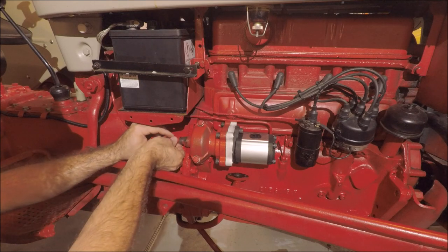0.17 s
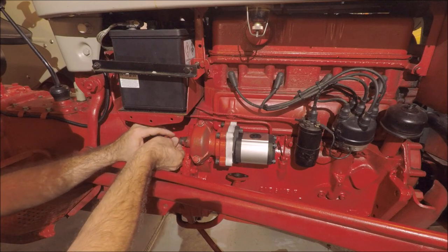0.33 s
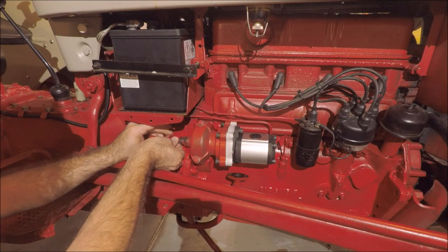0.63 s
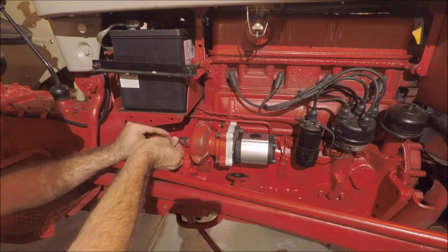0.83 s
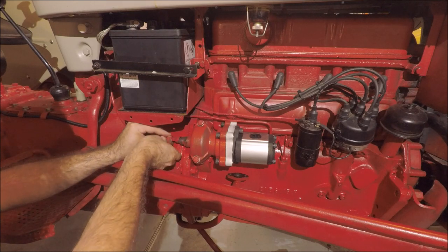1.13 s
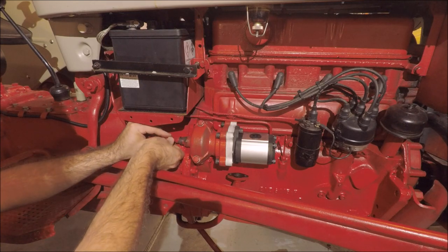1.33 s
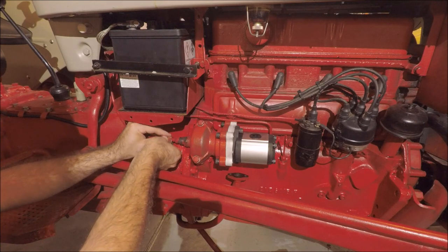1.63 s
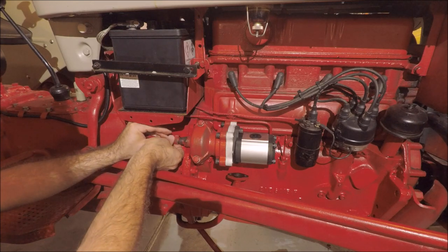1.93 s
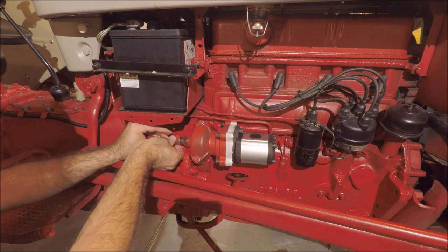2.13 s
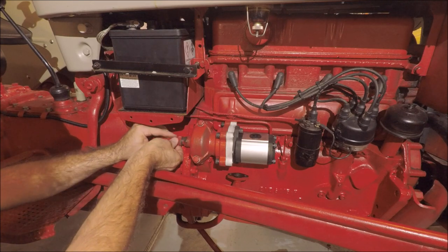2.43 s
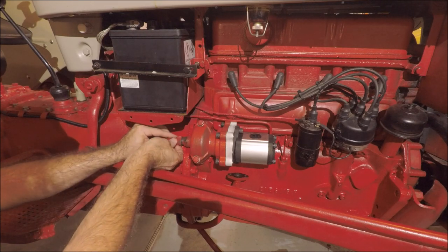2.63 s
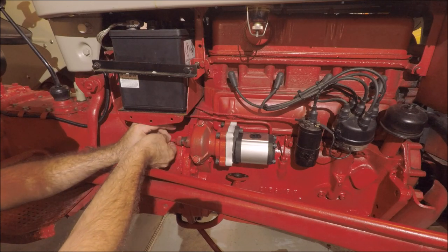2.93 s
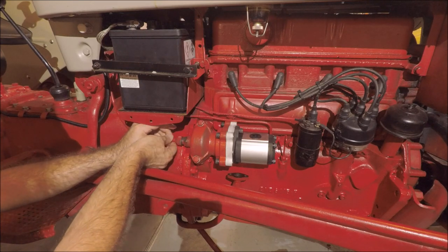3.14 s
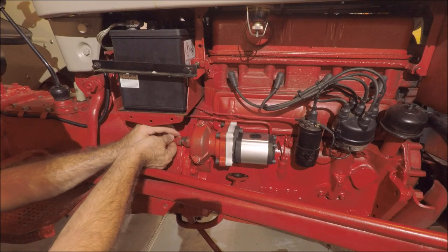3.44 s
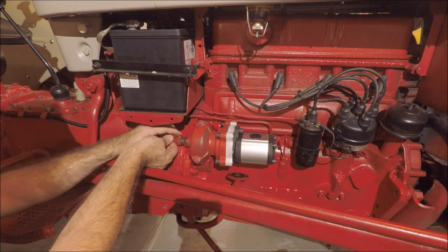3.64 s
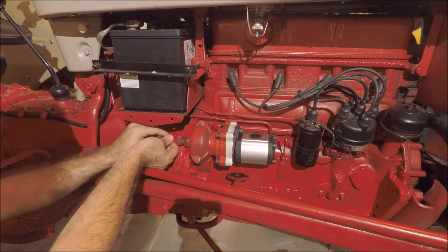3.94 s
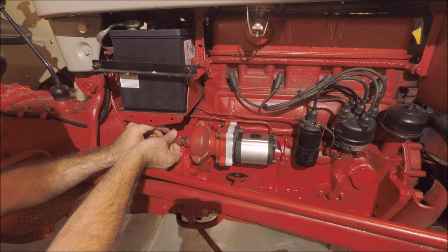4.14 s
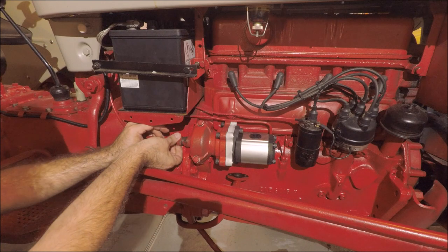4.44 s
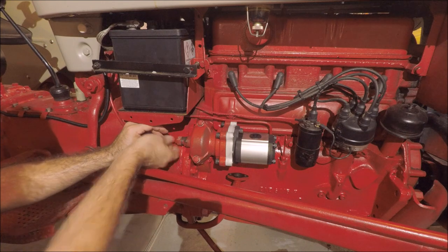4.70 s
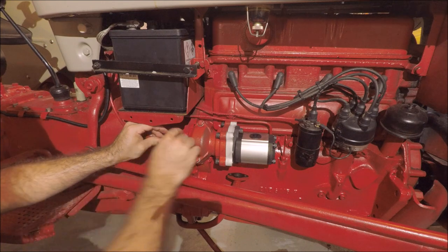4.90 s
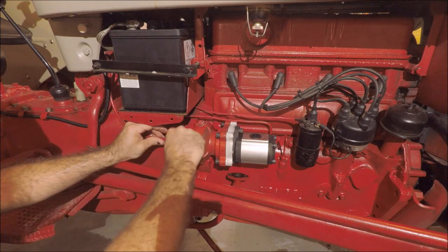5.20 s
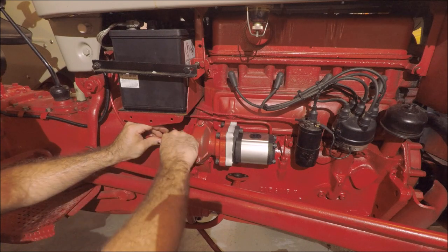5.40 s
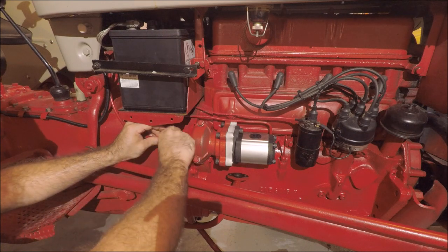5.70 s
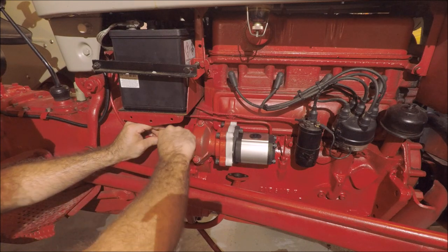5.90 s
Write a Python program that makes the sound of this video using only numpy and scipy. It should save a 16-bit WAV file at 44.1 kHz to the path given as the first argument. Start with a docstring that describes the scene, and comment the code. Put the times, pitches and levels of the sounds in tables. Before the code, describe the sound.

Over a fan motor's low hum and airy rumble, a nut ticks on its thread, metal clanks sharply twice, and hands softly bump sheet metal.

```python
"""In a workshop, a cable nut is threaded by hand onto a fitting on a tractor's stopped engine.
The threads tick (impulses into resonances) and scrape (friction noise); the steel cable end clanks and
hands bump the sheet metal (short noise forces into resonant bodies). The room answers with decaying noise.
Behind them a fan motor hums (sine multiples), a low tone swells once, and air rumbles and hisses (noise).
A limiter ducks loud moments, then the peaks are clipped."""
import sys
import numpy as np
from scipy import signal
from scipy.fft import rfft, irfft, next_fast_len
from scipy.io import wavfile
from scipy.ndimage import uniform_filter1d, map_coordinates

SR = 44100
rng = np.random.default_rng(int(sys.argv[2]) if len(sys.argv) > 2 else 0)


def pcm_store(signal):
    """Save signal as 16-bit PCM."""
    levels = np.round(np.clip(np.atleast_2d(signal), -1, 1) * 32767)
    wavfile.write(sys.argv[1], SR, levels.astype(np.int16).T)


N = 267246  # samples

# the steel cable end strikes the fitting: (time [s], relative level [dB], t60 [s])
CLANKS = [(1.7069, -29, 0.04), (2.1608, -9.5, 0.079), (2.2040, -25, 0.013), (2.2854, -11, 0.063),
          (2.329, -23, .018), (5.7424, -26, 0.016)]
# the nut catches on the thread: (time [s], relative level [dB], lower resonance [Hz])
THREAD_CATCHES = [(0.9362, -36.5, 7200), (2.0714, -22, 3360), (2.875, -15.5, 6320), (3.4367, -29.5, 3800),
                  (3.547, -31, 7750), (3.632, -25, 4030), (4.4785, -24, 3600), (4.54, -27.5, 3160),
                  (4.938, -41, 2350), (5.7815, -26, 3330)]
# hands and cable bump the sheet metal: (time [s], relative level [dB], hardness [0-1], panel t60 [s])
BUMPS = [(0.116, -37.5, 0.34, 0.22), (0.2, -40, 0.23, 0.11), (0.394, -37, 0.39, 0.25),
         (0.55, -42.5, 0.55, 0.19), (1.313, -43, 0.43, 0.33), (1.641, -42.5, .36, .18),
         (1.706, -31, .61, 0.35), (2.072, -41.5, 0.94, 0.098), (2.225, -34.5, 0.46, 0.33),
         (2.264, -31.5, 0.41, 0.14), (2.294, -32.5, 1, .12), (3.208, -38, 0.22, 0.05),
         (3.216, -37.5, 0.02, 0.083), (3.435, -42.5, .5, 0.25), (3.663, -40, 0.26, 0.24),
         (4.541, -34.5, 0.52, .09), (5.785, -32.5, 0.61, 0.17), (5.924, -44, 0.76, 0.071)]
# the nut slides round: (time [s], relative level [dB], length [s])
SCRAPES = [(0.542, -53, 0.044), (1.285, -49.5, 0.053), (2.149, -42, 0.045), (2.238, -43, 0.05),
           (2.662, -55, .067), (3.414, -48, 0.041), (3.513, -56, .065), (3.623, -48.5, 0.045),
           (4.388, -48.5, 0.066), (4.453, -48.5, 0.049), (4.632, -52, 0.059), (5.725, -50, 0.14)]
# resonances of the struck steel: (centre [Hz], width [Hz], relative level [dB])
STEEL_MODES = [(4050, 900, -8), (5950, 700, -6), (6470, 130, 4), (7100, 800, -3), (8550, 500, -5),
               (10300, 1800, -11), (11880, 250, -4), (12900, 1000, -4)]
# resonances of the bracket: (centre [Hz], width [Hz], relative level [dB])
BRACKET_MODES = [(1200, 300, -7), (1520, 30, -2), (1738, 40, 2), (1780, 45, -2), (1855, 80, -2),
                 (2040, 200, -2), (2365, 150, -3), (2900, 300, -9), (3500, 700, -12)]
# resonances of the sheet-metal panel: (centre [Hz], width [Hz], relative level [dB])
PANEL_MODES = [(435, 60, -5), (475, 28, -1), (568, 24, 0), (637, 14, 6), (715, 22, -1), (773, 25, -5),
               (815, 25, -5), (915, 30, -11), (1110, 60, -13)]
# low resonances of a soft blow: (centre [Hz], width [Hz], relative level [dB])
THUD_MODES = [(195, 12, 0.5), (241.3, 26, 0.5), (333, 12, -5), (434, 34, -7.5)]
# spectral shape of thread friction: (frequency [Hz], relative density [dB per Hz])
FRICTION_SPECTRUM = [(300, -5), (1000, 4.5), (3500, 5.5), (5000, 2), (6700, 4.5), (9500, 0), (12000, 1),
                     (16000, -20)]
# spectral shape of the air's rumble: (frequency [Hz], relative density [dB per Hz])
RUMBLE_SPECTRUM = [(10, -5.5), (20, 6), (30, -1.5), (42, -4.5), (70, -0.5), (100, -6.5), (135, -8.5),
                   (160, -13.5), (200, -14.5), (280, -18), (400, -32.5), (800, -61)]
# spectral shape of the hiss: (frequency [Hz], relative density [dB per Hz])
HISS_SPECTRUM = [(150, -19), (300, -4), (400, -8), (650, -10.5), (900, -12.5), (1300, -11.5), (1800, -14),
                 (3000, -17), (7000, -17.5), (15800, -18)]
# left-right likeness of a diffuse field: (frequency [Hz], correlation [0-1])
LIKENESS = [(60, 1), (130, 1), (290, 0.86), (640, 0.46), (1400, 0.13), (3000, 0), (15000, .03)]
# slow course of the rumble: (time [s], relative level [dB])
RUMBLE_COURSE = [(0.0, -31), (0.46, -33), (0.57, -31.5), (2.39, -34), (2.45, -30), (4.2, -34),
                 (6.06, -33.5)]
# decay of the workshop's echo: (frequency [Hz], t60 [s])
WALL_DECAY = [(150, .55), (600, .72), (2000, .6), (7000, .5), (14000, .45)]

BAND_TOP_HZ = 15850
# a clank also shakes the sheet metal, by its push: strength times length, against a full blow's length
SHAKE_DB, SHAKE_HARDNESS, SHAKE_T60_S, FULL_BLOW_S = -17.5, 0.8, 0.21, 0.074
# a tick at the reference level lasts the reference t60; each dB above shortens it by a factor of 0.34 dB
TICK_REF_T60_S, TICK_REF_DB, TICK_SHORTENING_DB_PER_DB = 0.013, -27, 0.34
# soft contacts thud, hard ones ring the bracket: drive against the panel's at hardness 0 and 1
THUD_DB_SOFT_HARD = [17.5, -20]
BRACKET_DB_SOFT_HARD = [-27.5, 16.5]
BRACKET_T60_SHARE = 0.64  # of the panel's t60
# the contact's dead knock: a harder contact is shorter, so it lies higher; width as a share of its pitch
KNOCK_DB, KNOCK_T60_S, KNOCK_SOFT_HZ, KNOCK_OCTAVES, KNOCK_WIDTH = 0.5, 0.071, 237, 3.45, 0.77
# mean rms level of each successive multiple
SHAFT_HZ, FAN_DB = 29.1, [-46.5, -38.5, -40.5, -73, -44.5, -47]
BUZZ_HZ, BUZZ_DB = 119.5, [-48, -54.5]  # twice the mains frequency
DRONE_START_S, DRONE_LENGTH_S, DRONE_DB = 0.5, 1.57, -37  # rms level at the top of the swell
DRONE_HZ, DRONE_RISE_HZ_PER_S = 127.3, 3.5


def clanks():
    """Modal ringing and early reflection: the cable end cracks and rings; the engine block throws it back."""
    times, levels_db, t60 = np.transpose(CLANKS)
    force = chatter(blows(times, levels_db, t60, rise=0.0002), alike=0.023)
    ring = resonate(force, STEEL_MODES, soft_hz=12600) * amp([[-1.2], [1.2]])  # slightly to the right
    block_decay = [(3000, 0.26), (14000, 0.02)]  # (frequency [Hz], t60 [s])
    return ring + amp(-9) * reflections(ring, block_decay, delay=0.0059)


def ticks():
    """Impulse excitation: each catch of the thread jolts and chatters in two broad resonances."""
    out = np.zeros((2, N))
    for time, db, hz in THREAD_CATCHES:
        start = round(time * SR)
        span = slice(start, start + SR // 10)
        t60 = TICK_REF_T60_S * amp(-TICK_SHORTENING_DB_PER_DB * (db - TICK_REF_DB))
        snap = chatter(blows([time], [db], t60, rise=0.00011)[span], alike=0.88)
        snap[:, round(0.0004 * SR)] += amp(db - 6.5)  # the jolt, one sample long
        modes = [(hz, hz * 0.21, 0), (hz * 2, hz * 0.36, -8)]
        out[:, span] += resonate(snap, modes, soft_hz=12600)
    return out * amp([[-0.4], [0.4]])


def scrapes():
    """Friction noise: each twist rubs the threads together in a short swell of uneven slips."""
    stroke = np.zeros(N)
    for time, db, length in SCRAPES:
        progress = np.clip((clock() - time) / length, 0, 1)
        stroke += amp(db) * np.sin(np.pi * progress)
    slips = chatter(amp(2.0 * wobble(400)), alike=0.23)
    grit = unit(filtered(slips, lambda hz: amp(along(FRICTION_SPECTRUM, hz))))
    return amp(9.5) * stroke * grit


def bumps():
    """Forced vibration: blows stir the sheet metal; hardness shares them between thud and bracket."""
    shakes = []
    for time, db, t60 in CLANKS:
        push_db = db + 20 * np.log10(t60 / FULL_BLOW_S)
        shakes.append((time, push_db + SHAKE_DB, SHAKE_HARDNESS, SHAKE_T60_S))
    times, panel_db, hardness, t60 = np.transpose(BUMPS + shakes)
    thud_db = panel_db + np.interp(hardness, [0, 1], THUD_DB_SOFT_HARD)
    bracket_db = panel_db + np.interp(hardness, [0, 1], BRACKET_DB_SOFT_HARD)
    panel_force = chatter(blows(times, panel_db, t60, rise=0.00094), alike=0.85)
    thud_force = chatter(blows(times, thud_db, t60, rise=0.0014), alike=1.0)
    bracket_force = chatter(blows(times, bracket_db, BRACKET_T60_SHARE * t60, rise=0.0014), alike=0.44)
    panel = resonate(panel_force, PANEL_MODES, soft_hz=1490)
    thud = resonate(thud_force, THUD_MODES, soft_hz=564)
    bracket = resonate(bracket_force, BRACKET_MODES, soft_hz=4000)
    return panel + thud + bracket * amp([[-0.4], [0.4]])


def knocks():
    """Contact noise: every bump starts with a broad, heavily damped knock, higher for a harder contact."""
    out = np.zeros((2, N + SR))
    length = SR // 4
    for time, db, hardness, _ in BUMPS:
        hz = KNOCK_SOFT_HZ * 2 ** (KNOCK_OCTAVES * hardness)
        envelope = blows([0], [db + KNOCK_DB], KNOCK_T60_S, rise=0.00042)[:length]
        force = chatter(envelope, alike=0.61)
        knock = resonate(force, [(hz, hz * KNOCK_WIDTH, 0)], soft_hz=hz * 2.31)
        start = round(time * SR)
        out[:, start:start + length] += knock
    return out[:, :N]


def reflections(x, t60, delay):
    """Reverberation: the left channel of x meets delayed diffuse noise, dying by (Hz, t60 in s)."""
    hz, t, noise = signal.stft(rng.standard_normal((2, SR)), SR, nperseg=256)
    decay = np.exp(-np.log(1000) * t / along(t60, hz)[:, None])
    tail = spread(signal.istft(noise * decay, SR, nperseg=256)[1])
    tail = tail / np.linalg.norm(tail[0])
    tail = np.pad(tail, ((0, 0), (round(abs(delay) * SR), 0)))
    return signal.fftconvolve(x[:1], tail, axes=1)[:, :N]


def hum():
    """Harmonic series: a fan motor sounds unsteady multiples of its shaft speed and of the mains buzz."""
    t, lines = clock(), 0
    for base_hz, levels_db in [(SHAFT_HZ, FAN_DB), (BUZZ_HZ, BUZZ_DB)]:
        for multiple, db in enumerate(levels_db, 1):
            strength = amp(db + 2.15 * wobble(5))
            cycles = multiple * base_hz * t + rng.random()
            lines = lines + strength * np.sin(2 * np.pi * cycles + 0.27 * wobble(3.02))
    return np.sqrt(2) * lines  # rms to peak


def drone():
    """Frequency glide: one low tone swells and leaves while its pitch creeps up."""
    age = np.clip(clock() - DRONE_START_S, 0, DRONE_LENGTH_S)
    hz = DRONE_HZ + DRONE_RISE_HZ_PER_S * age
    swell = np.sin(np.pi * age / DRONE_LENGTH_S)
    return np.sqrt(2) * amp(DRONE_DB) * swell * np.sin(2 * np.pi * np.cumsum(hz) / SR)


def moving_air():
    """Broadband flow noise: a low rumble of varying level under an even hiss."""
    rumble_db = np.interp(clock(), *np.transpose(RUMBLE_COURSE)) - 1
    return amp(rumble_db) * rush(RUMBLE_SPECTRUM) + amp(-43.0) * rush(HISS_SPECTRUM)


def rush(spectrum):
    """Spectral shaping: white noise becomes a diffuse stereo field of rms 1."""
    noise = rng.standard_normal((2, N))
    return unit(spread(filtered(noise, lambda hz: amp(along(spectrum, hz)))))


def spread(pair):
    """Diffuse-field coherence: two unrelated signals mix to mono in the bass, wide in the treble."""
    def mid_side_gains(hz):
        # the cosine of twice this angle is the left-right correlation
        angle = np.arccos(np.clip(along(LIKENESS, hz), 0, 1)) / 2
        return np.array([np.cos(angle), np.sin(angle)])
    mid, side = filtered(pair, mid_side_gains)
    return np.array([mid + side, mid - side])


def blows(times, levels_db, t60, rise):
    """Exponential decay: contacts build up quickly (rise in s) and die away, adding in power."""
    power, t = np.zeros(N + SR), np.arange(SR // 2) / SR
    for time, db, life in zip(times, levels_db, np.broadcast_to(t60, len(times))):
        start = round(time * SR)
        decay = np.exp(-np.log(1000) * t / life)
        onset = 1 - np.exp(-t / rise)
        power[start:start + len(t)] += (amp(db) * decay * onset) ** 2
    return np.sqrt(power[:N])


def chatter(envelope, alike):
    """Stochastic force: a rough contact is noise, partly alike at the two ears."""
    shared = np.clip(alike, 0, 1)
    noise = rng.standard_normal((3, len(envelope)))
    return envelope * (np.sqrt(shared) * noise[0] + np.sqrt(1 - shared) * noise[1:])


def resonate(x, modes, soft_hz, size=16384):
    """Resonance: x rings a body's modes; a contact of finite hardness drives little above soft_hz."""
    f = np.fft.rfftfreq(size, 1 / SR)
    power = 0
    for centre, width, db in modes:
        damping = (f * width) ** 2
        power = power + amp(2 * db) * damping / ((centre ** 2 - f * f) ** 2 + damping)
    power = power / (1 + (f / soft_hz) ** 20)
    # minimum phase: nothing sounds before the blow
    cepstrum = irfft(np.log(power / power.mean() + 1e-9))[:size // 2]
    cepstrum[0] /= 2
    ring = irfft(np.exp(rfft(cepstrum, size)))
    return signal.fftconvolve(x, ring[None], axes=1)[:, :x.shape[1]]


def filtered(x, response):
    """Linear filtering: the spectrum of x times a response of frequency."""
    n = x.shape[-1]
    padded = next_fast_len(n + 8192, True)
    return irfft(rfft(x, padded) * response(np.fft.rfftfreq(padded, 1 / SR)), padded)[..., :n]


def wobble(rate):
    """Slow random modulation: a smooth curve through rate random knots a second."""
    knots = rng.standard_normal(int(N * rate / SR) + 4)
    return map_coordinates(knots, [clock() * rate])


def along(points, hz):
    """Logarithmic frequency scale: interpolates (Hz, value) points."""
    f, values = np.transpose(points)
    return np.interp(np.log(hz + 1), np.log(f + 1), values)


def amp(db):
    """Level law: decibels to amplitude gain."""
    return 10 ** (np.asarray(db) / 20)


def unit(x):
    """Normalisation: x at rms 1."""
    return x / np.sqrt(np.mean(x ** 2) + 1e-20)


def clock():
    """Sampling: the time of every sample in seconds."""
    return np.arange(N) / SR


def scene():
    """Superposition: hand work and the workshop's echo add to the background."""
    steel = clanks()
    nut = ticks() + scrapes()
    body = bumps() + knocks()
    to_walls = amp(-4.0) * steel + amp(-6.5) * nut + amp(-1) * body
    echo = reflections(to_walls, WALL_DECAY, delay=0.014)
    return steel + nut + body + echo + hum() + drone() + moving_air()


def record(dry, offset=-0.061, top=0.15):
    """Limiting: gain follows the level and ducks everything, a constant offset too; peaks then clip."""
    x = filtered(dry, lambda hz: hz < BAND_TOP_HZ)
    level = np.sqrt(abs(uniform_filter1d(np.mean(x ** 2, axis=0), size=150)))
    ceiling_db, release_s = -19.5, 0.09
    over = np.maximum(0, np.log(level / amp(ceiling_db) + 1e-9))
    # the gain drops at once; its log recovers exponentially
    fade = np.exp(-clock() / release_s)
    gain = np.exp(-np.maximum.accumulate(over / fade) * fade)
    limited = np.clip((x + offset) * gain, -top, top)
    return filtered(limited - offset, lambda hz: hz < BAND_TOP_HZ) + offset


dry = scene()
out = record(dry)
pcm_store(out)
```